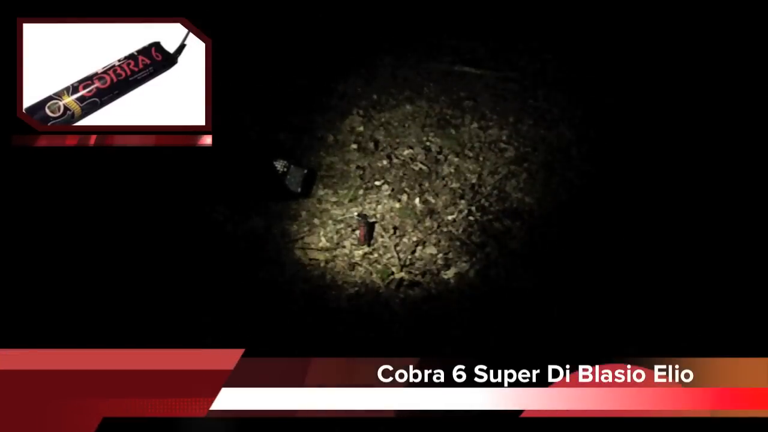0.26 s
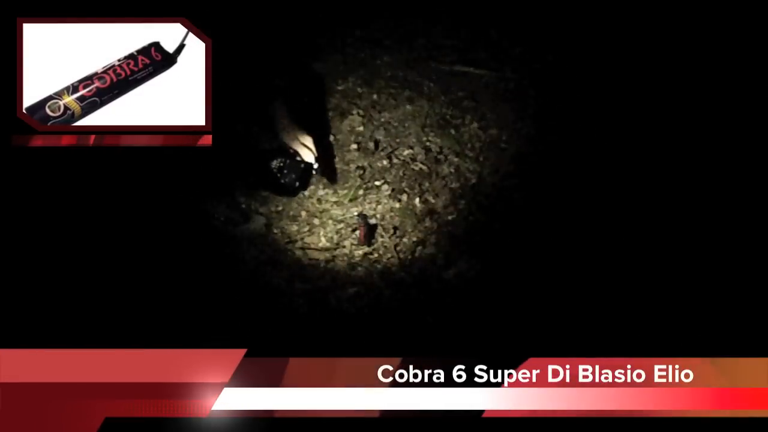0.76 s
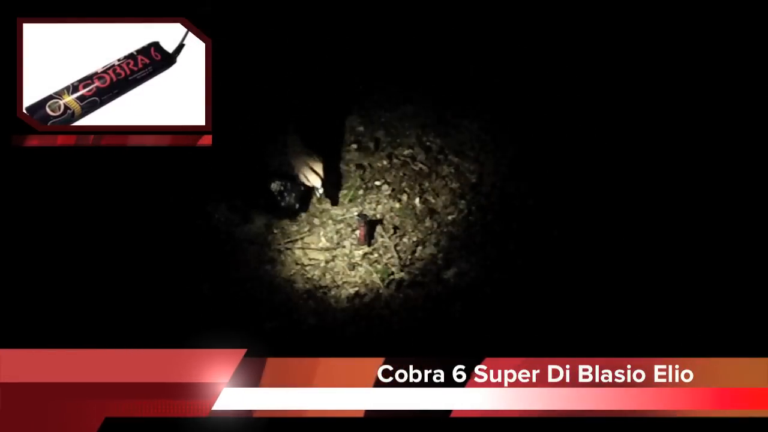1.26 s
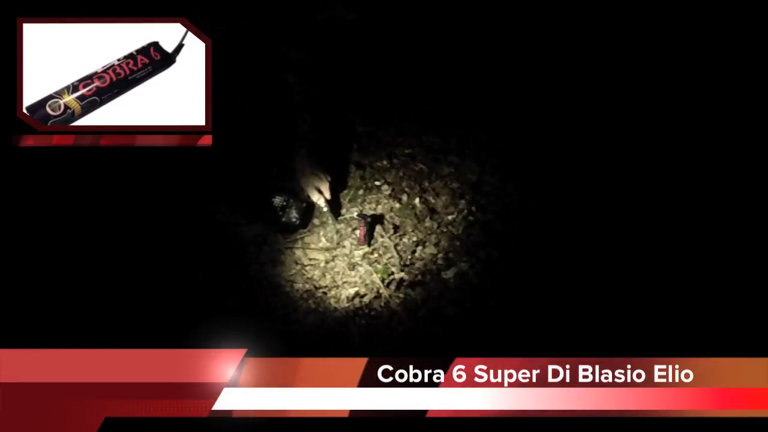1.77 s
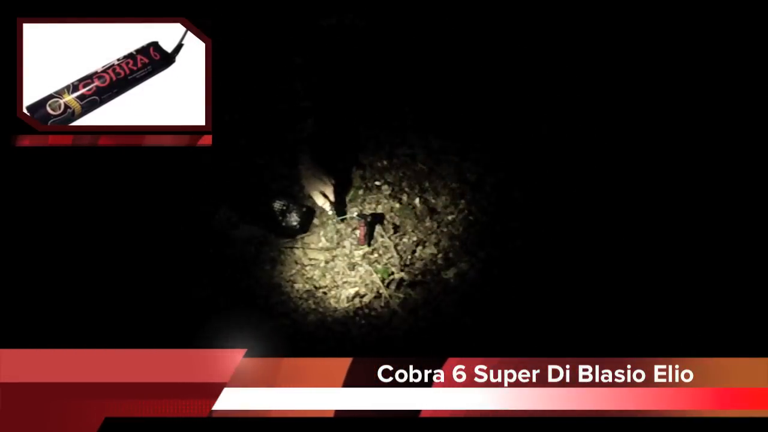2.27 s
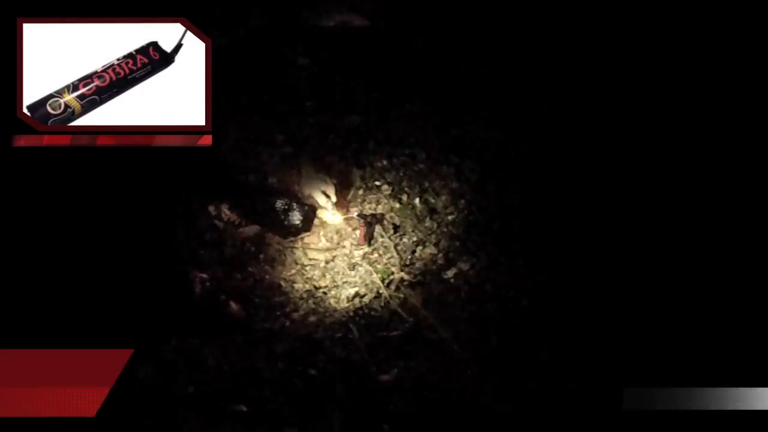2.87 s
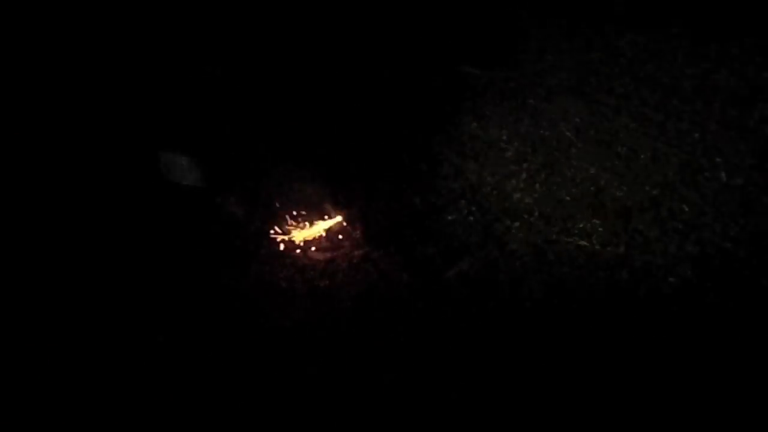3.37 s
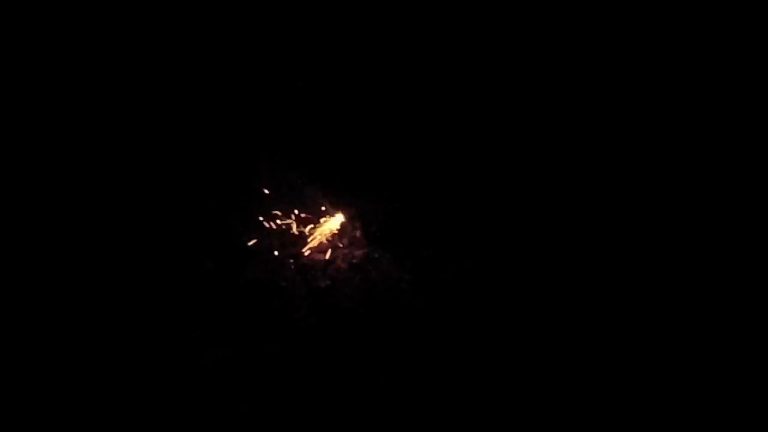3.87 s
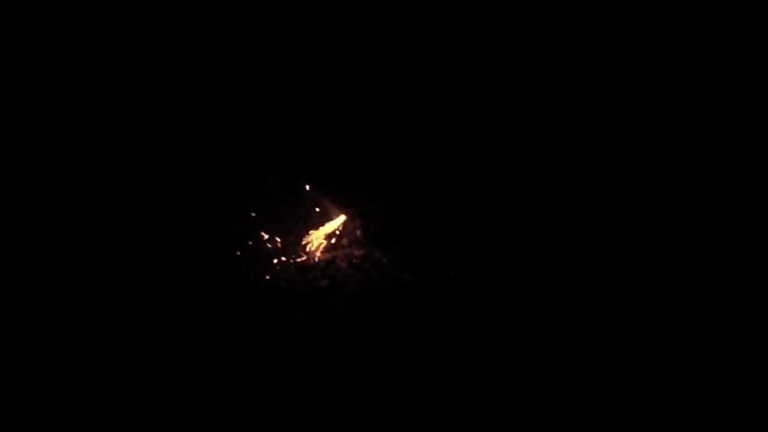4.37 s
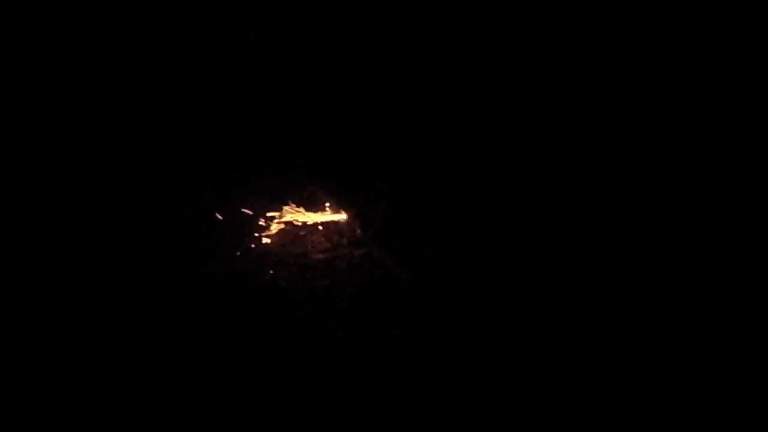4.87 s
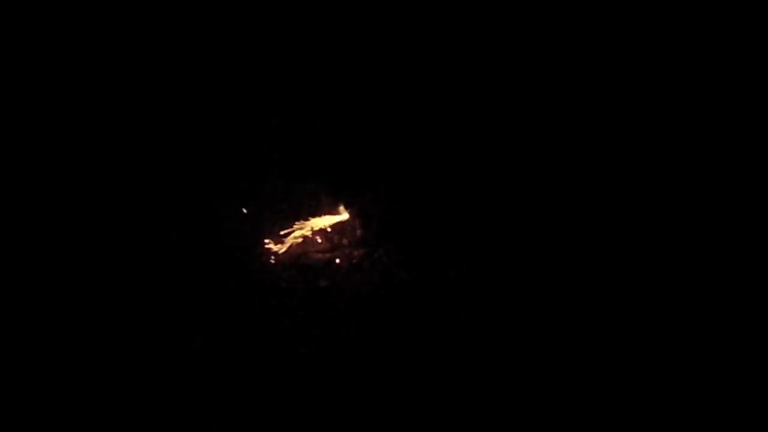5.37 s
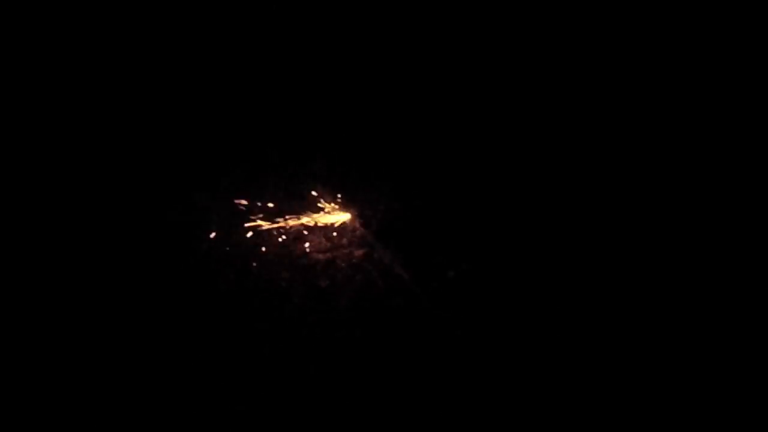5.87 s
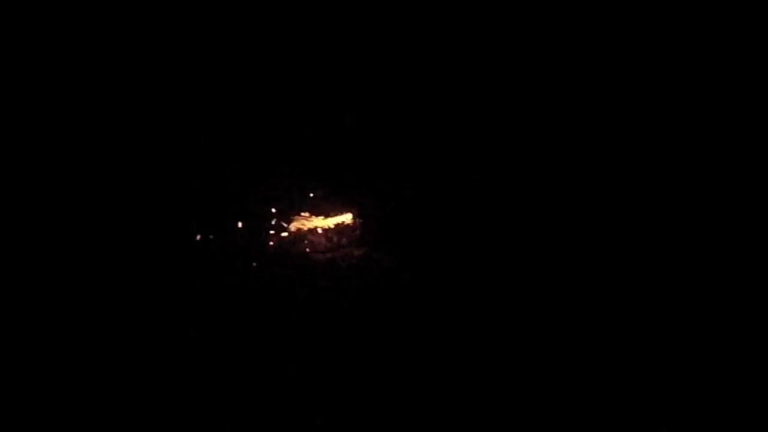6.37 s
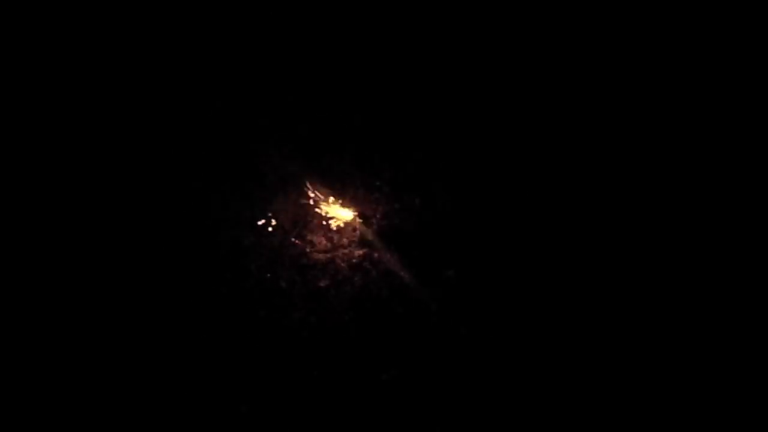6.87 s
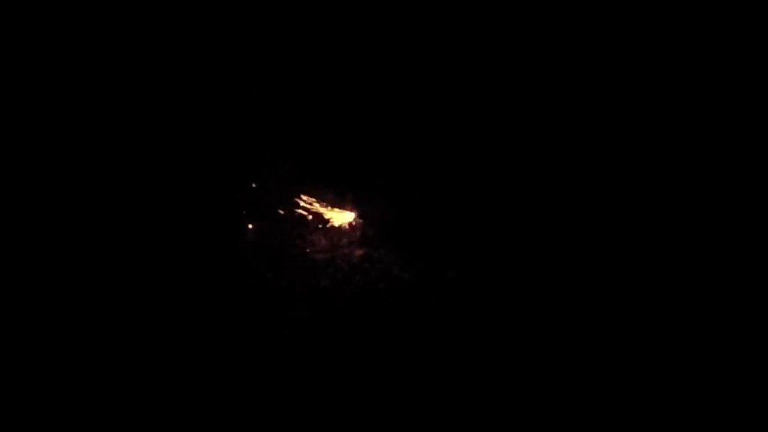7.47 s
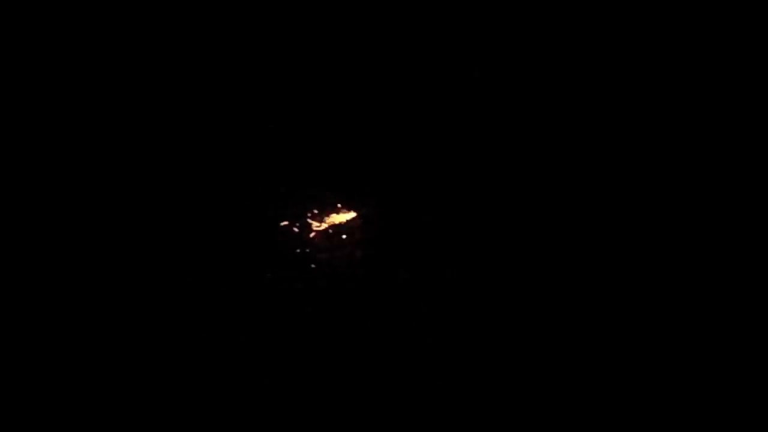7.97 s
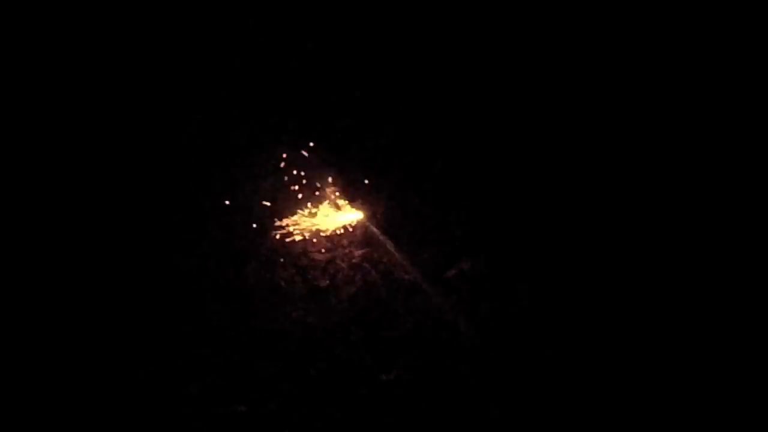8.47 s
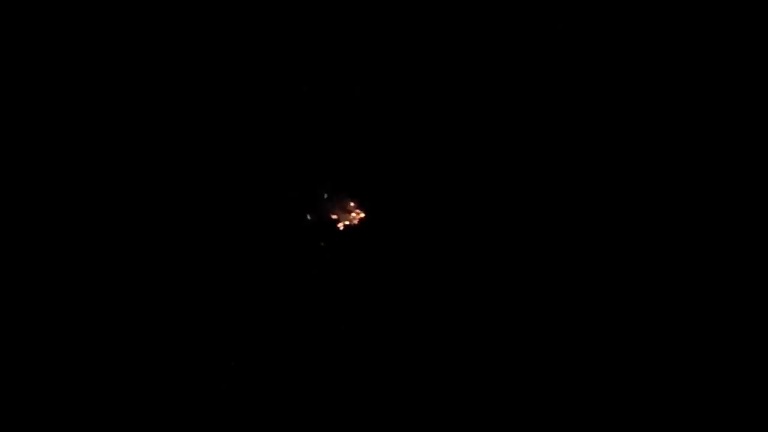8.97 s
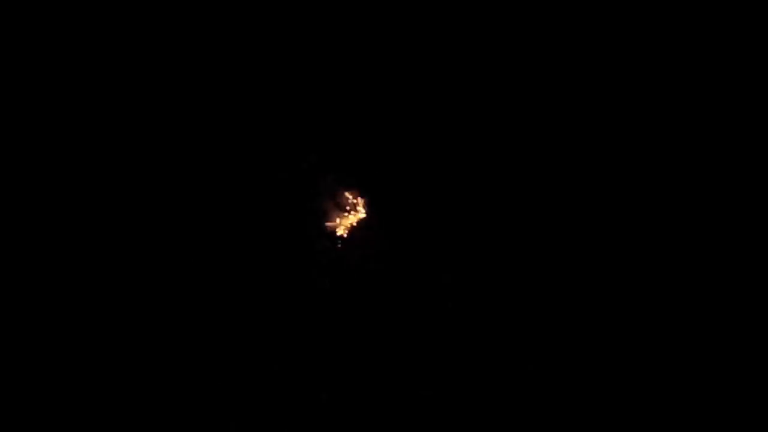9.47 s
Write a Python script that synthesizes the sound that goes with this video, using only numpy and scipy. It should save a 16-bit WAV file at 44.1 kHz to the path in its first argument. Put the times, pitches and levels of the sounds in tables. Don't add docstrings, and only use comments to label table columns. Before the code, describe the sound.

Quiet open ground with a low traffic rumble and soft tyre roar. Faint cloth brushing precedes a dry, loud lighter snap and a weak gas stream. The fuse then ignites, sputtering up into a steady airy hiss full of fine sparks and small crackles. Soles drag, heels thud and stones knock briefly. The hiss weakens, flares strongly, then stays bright and thin. Single microphone, centred, dry; there is no final explosion.

```python
import sys
import numpy as np
from scipy import signal
from scipy.fft import rfft, irfft, next_fast_len
from scipy.io import wavfile
from scipy.ndimage import uniform_filter1d

SR = 44100
rng = np.random.default_rng(int(sys.argv[2]) if len(sys.argv) > 2 else 0)


def transcribe(signal):
    frames = np.atleast_2d(signal).T
    limited = np.clip(frames, -1, 1)
    pcm = np.round(limited * 32767).astype(np.int16)
    wavfile.write(sys.argv[1], SR, pcm)


def gain_from_decibels(decibels):
    exponent = np.asarray(decibels, float) / 20
    return 10 ** exponent


N = 428211
TIME = np.arange(N) / SR


def curves(table):
    s, *columns = np.transpose(table)
    return [np.interp(TIME, s, column) for column in columns]


def colour(x, points):
    hz, db = np.transpose(points)
    size = next_fast_len(len(x))
    log_hz = np.log(np.arange(size // 2 + 1) * SR / size + 1)
    gain = gain_from_decibels(np.interp(log_hz, np.log(hz), db))
    return irfft(rfft(x, size) * gain, size)[:len(x)]


def band(x, lo_hz, hi_hz):
    return signal.sosfiltfilt(signal.butter(3, [lo_hz, hi_hz], "band", fs=SR, output="sos"), x)


def unit(x, lo_hz, hi_hz):
    return x / np.std(band(x, lo_hz, hi_hz))


def walk(rate):
    hold = int(SR / rate)
    steps = np.repeat(rng.standard_normal(N // hold + 1), hold)
    return 1.02 * uniform_filter1d(uniform_filter1d(steps, hold), hold)[:N]


def add(out, s, sound):
    i = int(round(s * SR))
    out[i:i + len(sound)] += sound[:N - i]


def ring(hz, t60, attack):
    t = np.arange(int(t60 * SR) + 8) / SR
    y = np.sin(2 * np.pi * hz * t) * (1 - np.exp(-t / attack)) * np.exp(-np.log(1000) * t / t60)
    return y / np.abs(y).max()


def hits(events, cycles, trim_db):
    out = np.zeros(N)
    for s, db, hz in events:
        add(out, s + 0.00118, gain_from_decibels(db + trim_db) * ring(hz, cycles / hz, .3 / hz))
    return out


def bursts(events, t60, trim_db):
    out, t = np.zeros(N), np.arange(512) / SR
    envelope = gain_from_decibels(-60 * t / t60) * np.clip(t / 0.00037, 0, 1)
    for (s, db, hz), noise in zip(events, rng.standard_normal((len(events), 512))):
        puff = band(noise, hz / 1.77, min(hz * 1.84, 16000)) * envelope
        add(out, s + .0008, gain_from_decibels(db + trim_db) * puff / np.abs(puff).max())
    return out


def swells(events):
    out = np.zeros(N)
    for s, db, width in events:
        near = slice(max(int((s - 4 * width) * SR), 0), int((s + 4 * width) * SR))
        out[near] += db * np.exp(-.5 * ((TIME[near] - s) / width) ** 2)
    return out


# (t/s, steady hiss level/dB, swing level/dB by which the low roar stands out)
BURN = [(2.58, -74, -2), (2.66, -70, -7), (2.78, -57, -5), (2.86, -45.5, 2), (3.05, -40, -3),
        (3.3, -40.5, -2), (4.0, -42, -2.5), (5.0, -42.5, -0.5), (5.6, -42, -0.5), (6.5, -46, -1.5),
        (7.0, -48, -0.5), (7.6, -44.5, -3.5), (7.95, -43.5, -6), (8.38, -42.5, 1), (8.75, -43.5, -8),
        (9.15, -42.5, -7.5), (9.55, -39, -7.5), (9.71, -39.5, -8.5)]
# (t/s, swell level/dB, half width/s)
POWDER_SURGES = [(2.6, 6, .012), (2.68, 5, .012), (3.316, 7, .024), (3.468, 1.7, .075), (3.555, 5.5, .013),
                 (3.705, 2.7, .027), (3.993, 3.5, .02), (4.225, 2, .03), (4.28, -3.5, .035), (4.39, 3, .06),
                 (4.666, 1.9, .035), (4.821, 3.7, .031), (5.071, 2.7, .038), (5.241, 4, .062),
                 (5.437, 5.5, .018), (5.536, 3.7, .081), (5.765, 4, .044), (5.826, -3.8, .025),
                 (5.954, 4.9, .059), (6.146, 3, .04), (6.317, 3.6, .036), (6.464, 4.3, .063),
                 (6.7, 6.2, .041), (7.219, 5.2, .071), (7.562, 4.1, .048), (8.32, 3, .045),
                 (8.39, 10, .155), (8.857, 4.3, .095), (9.433, 1.5, .025)]
# (f/Hz, density level/dB per Hz)
JET_TONE = [(410, -38), (700, -22), (1300, -11), (1900, -4.5), (2700, -5), (3800, -5), (5500, -2.5),
            (8500, -2), (11700, -3.5), (13500, -6.5), (15400, -12.5)]
# (t/s, peak level/dB, centre f/Hz)
POPS = [(2.5932, -48, 5030), (2.6182, -48, 6950), (2.674, -41, 7060), (2.694, -45, 4820),
        (2.7025, -43, 7730), (2.7638, -41, 8170), (2.8247, -32, 7040), (2.946, -23, 8140),
        (3.0467, -21, 8020), (3.2961, -19, 6820), (3.3097, -12, 6260), (3.5446, -24, 7210),
        (3.8539, -23, 6290), (4.2959, -26, 11600), (5.1805, -30, 7150), (5.8473, -25, 8550),
        (6.3133, -22, 8690), (6.4214, -29, 8770), (7.1758, -23, 7560), (8.217, -22, 9020),
        (9.3668, -27, 7800)]


def fuse():
    steady_db, swing_db = curves(BURN)
    surge_db = swells(POWDER_SURGES)
    hiss_db = steady_db + surge_db

    sparks_per_s, spark_fade_s = 150, 0.00051
    chance, size, gas = rng.random(N), rng.exponential(size=N), rng.standard_normal(N)
    sparks = (chance < sparks_per_s / SR) * gain_from_decibels(2.6 * np.minimum(size, 2.5))
    flare = signal.lfilter([1], [1, -np.exp(-1 / (spark_fade_s * SR))], sparks)
    flutter = gain_from_decibels(0.9 * walk(40) + 0.59 * walk(150))
    jet = unit(colour(gas * (flutter + 0.45 * flare), JET_TONE), 6950, 11000)

    body_swing, fizz_swing = .75, -.4
    lag_db = .4 * surge_db
    roar_db = swing_db - lag_db
    body_db = body_swing * np.minimum(swing_db + 2, 1.5) - 0.8 - body_swing * lag_db
    fizz_db = fizz_swing * np.minimum(swing_db + 2, 0) - 2.1
    roar = band(jet, 300, 3600) * (gain_from_decibels(roar_db) - 1)
    body = band(jet, 3600, 7000) * (gain_from_decibels(body_db) - 1)
    fizz = band(jet, 11200, 20000) * (gain_from_decibels(fizz_db) - 1)
    jet = (jet + roar + body + fizz) * gain_from_decibels(hiss_db) * (TIME > BURN[0][0])

    flame = unit(band(rng.standard_normal(N), 180, 520), 180, 520) * gain_from_decibels(1.5 * hiss_db - 13)
    return flame + reflect(jet + bursts(POPS, t60=0.0035, trim_db=-2.5))


# (start t/s, end t/s, lag/ms, strength -1..1)
ECHOES = [(2.5, 4.2, .208, -.05), (2.5, 6.0, .275, -.075), (2.5, 4.2, .317, -.1), (2.5, 5.5, .547, -.11),
          (2.5, 3.5, 1.362, -.07), (3.5, 4.9, .432, .075), (4.9, 6.05, .45, .14), (3.5, 6.05, .685, .13),
          (3.5, 6.05, .855, .12), (4.9, 6.05, .777, .1), (4.2, 5.5, 1.19, -.07), (4.9, 5.5, 1.31, -.09),
          (5.5, 6.6, 1.149, .065), (6.05, 8.1, .184, -.1), (6.05, 7.6, .311, -.12), (7.6, 8.65, .298, -.12),
          (6.05, 8.1, .519, -.11), (6.05, 8.1, .583, -.12), (6.05, 6.6, 1.064, .15), (6.6, 7.6, .793, .08),
          (6.6, 8.1, 1.26, -.065), (7.6, 8.1, .669, -.14), (8.1, 9.8, .222, .12), (8.1, 9.2, .615, -.12),
          (8.65, 9.8, .367, .085), (8.65, 9.2, .483, .1), (9.2, 9.8, .441, .1), (8.65, 9.8, .575, -.085),
          (8.65, 9.8, .806, -.075), (9.2, 9.8, .68, .06)]


def reflect(jet):
    gain, fade_s = 1.35, .4
    heard = jet.copy()
    for start, end, lag_ms, strength in ECHOES:
        i = int((start - fade_s / 2) * SR)
        j = min(int((end + fade_s / 2) * SR), N)
        fade = np.clip(np.minimum(TIME[i:j] - start, end - TIME[i:j]) / fade_s + .5, 0, 1)
        late = np.arange(96) - lag_ms * SR / 1000
        kernel = np.sinc(late) * np.exp(-.5 * (late / 4) ** 2)
        add(heard, i / SR, gain * strength * signal.oaconvolve(fade * jet[i:j], kernel))
    return heard


# (f/Hz, level/dB, t60/s)
LIGHTER_MODES = [(2690, -11.5, .025), (3960, -0.5, .018), (5460, 1, .009), (6700, -9, .009),
                 (7340, -1, .03), (7900, -5, .025), (8470, -5, .02), (9400, -10, .01), (10900, -14, .02),
                 (11500, -11, .02), (12050, -15, .012), (13600, -14, .02), (14160, -16, .015),
                 (15070, -19, .015)]
# (t/s, level/dB)
GAS = [(1.7, -80), (1.9, -71), (2.3, -70.5), (2.65, -73), (2.8, -81)]
# (t/s, peak level/dB, centre f/Hz)
TICKS = [
    (0.5294, -51, 7550),
    (0.6994, -53, 4060),
    (1.5045, -47, 2700),
    (1.5045, -46, 11500),
]


def lighter():
    snap_s, snap_db, free_s = 1.6935, -11.3, .0025
    t = np.arange(SR // 2) / SR
    body = np.zeros(len(t))
    for (hz, db, t60), late in zip(LIGHTER_MODES, rng.random(len(LIGHTER_MODES))):
        add(body, .00008 * late, gain_from_decibels(db) * ring(hz, t60, .0003))
    thumb = gain_from_decibels(-60 * np.maximum(t - free_s, 0) / .0015)
    body = body * np.maximum(thumb, gain_from_decibels(-5 - 60 * t / .03))
    body = signal.sosfilt(signal.butter(3, 1500, "high", fs=SR, output="sos"), body)

    scatter = rng.standard_normal(len(t)) * (gain_from_decibels(-49 - 60 * t / .05) + gain_from_decibels(-59 - 60 * t / 0.55))
    scatter = colour(scatter, [(6000, 0), (15000, -6)])
    answer = signal.fftconvolve(scatter, body * gain_from_decibels(12 - 60 * t / .004))[:len(t)]
    out = np.zeros(N)
    add(out, snap_s, gain_from_decibels(snap_db) * (body + answer))
    add(out, snap_s, gain_from_decibels(-32) * ring(140, .03, .002))

    nozzle = [(4000, -26), (4900, -3), (5350, 2), (5800, -13), (6800, -30)]
    gas = unit(colour(rng.standard_normal(N), nozzle), 4800, 5800)
    gas = gas * gain_from_decibels(curves(GAS)[0]) * (TIME > snap_s) * (TIME < GAS[-1][0])
    return out + gas + bursts(TICKS, t60=.006, trim_db=-1.5)


# (t/s, peak level/dB, rise/s, fall/s per 10 dB)
RUSTLES = [
    (.09, -67, .02, .1),
    (.36, -60.5, .15, .3),
    (.62, -70, .05, .1),
    (1.05, -65.5, .15, .3),
    (1.18, -59.5, .04, .4),
    (1.6, -64, .04, .15),
    (2.03, -67, .08, .05),
    (2.15, -70, .06, .1),
]
# (f/Hz, density level/dB per Hz)
CLOTH_TONE = [(1180, -40), (2000, -18), (2480, -14), (2670, -10), (3250, -9), (4820, -2.5), (9630, -1),
              (13400, -11), (15400, -14)]
# (t/s, peak level/dB, f/Hz)
GRAVEL = [(3.545, -37, 872), (3.674, -40, 697), (3.695, -37, 501), (3.861, -39, 654), (3.874, -40, 622),
          (3.983, -30, 851), (4.016, -38, 550), (4.194, -37, 560), (4.275, -41, 888), (4.478, -29, 500),
          (4.497, -32, 945), (4.507, -38, 501), (4.531, -36, 501), (4.536, -28, 1410), (4.639, -39, 685),
          (4.764, -40, 565), (4.773, -31, 524), (4.784, -33, 867), (4.889, -44, 570)]
# (t/s, level/dB)
SHUFFLE = [(2.8, -77), (3.3, -62), (3.9, -62), (4.3, -60), (4.5, -57.5), (4.8, -59), (5.1, -70), (5.6, -72)]
# (t/s, peak level/dB, f/Hz)
HEELS = [
    (3.874, -27, 56.5),
    (4.298, -31, 56.5),
    (4.674, -26.5, 122),
    (4.789, -33, 56.5),
]


def person():
    cloth = unit(colour(rng.standard_normal(N) * gain_from_decibels(1.5 * walk(60)), CLOTH_TONE), 6000, 12000)
    power = np.zeros(N)
    for s, db, rise, fall in RUSTLES:
        away = np.maximum((s - TIME) / rise, (TIME - s) / fall)
        power += gain_from_decibels(db - 10 * away) ** 2
    rustle = cloth * np.sqrt(power)

    stones = hits(GRAVEL, cycles=3.6, trim_db=0.5)
    grit = hits([(s, db, 1.9 * hz) for s, db, hz in GRAVEL], cycles=2.4, trim_db=-1)
    soles = unit(band(rng.standard_normal(N), 130, 570), 130, 700)
    soles = soles * gain_from_decibels(curves(SHUFFLE)[0] + 3.3 * walk(30))
    soles = soles * (TIME > SHUFFLE[0][0]) * (TIME < SHUFFLE[-1][0])
    heels = hits(HEELS, cycles=1.9, trim_db=1.0)
    return rustle + stones + grit + soles + heels


# (t/s, rumble level/dB)
TRAFFIC = [(0, -38), (3.2, -39), (4.4, -35.5), (5.2, -38.5), (8.5, -40), (9.7, -38)]
# (f/Hz, density level/dB per Hz)
RUMBLE_TONE = [(12, -12), (22, -4), (35, -1), (60, -5), (82, -10), (120, -18), (170, -30), (400, -60)]
# (t/s, level/dB)
TYRE_ROAR = [(0, -60), (1.5, -59), (2.8, -58.5), (4.5, -57.5), (6, -58), (7.5, -58), (8.6, -59),
             (9.7, -58.5)]
# (f/Hz, density level/dB per Hz)
TYRE_TONE = [(88, -9), (150, -5.5), (258, -7.5), (509, -13), (900, -11), (1100, -9.5), (1400, -13.5),
             (1900, -24.5), (2640, -26.5), (3670, -32), (5300, -28.5), (7090, -30.5), (10300, -28),
             (15400, -48)]
# (t/s, level/dB)
DRONE = [(8.25, -89), (8.45, -63.5), (8.9, -63.5), (9.3, -67), (9.55, -76)]
# (t/s, f/Hz, level/dB)
WHINE = [(.5, 903, -85), (1.1, 905, -68), (1.6, 909, -68), (2.3, 914, -85)]


def traffic():
    rumble = unit(colour(rng.standard_normal(N), RUMBLE_TONE), 17, 110)
    rumble = rumble * gain_from_decibels(curves(TRAFFIC)[0] + 1.2 * walk(8))
    tyres = unit(colour(rng.standard_normal(N), TYRE_TONE), 250, 872)
    tyres = tyres * gain_from_decibels(curves(TYRE_ROAR)[0] + 0.55 * walk(6))

    drone = np.zeros(N)
    for hz, db in [(366, 0), (441, -5)]:
        drone += gain_from_decibels(db) * np.sin(2 * np.pi * hz * TIME + .6 * walk(5))
    drone = drone * gain_from_decibels(curves(DRONE)[0] + 3)

    hz, whine_db = curves(WHINE)
    turn = 2 * np.pi * np.cumsum(hz) / SR
    whine = gain_from_decibels(whine_db) * (np.sin(turn) + gain_from_decibels(-20) * np.sin(3 * turn))
    return rumble + tyres + drone + whine


def scene():
    mono = fuse() + lighter() + person() + traffic()
    return np.array([mono, mono])


def roll_off(x):
    return signal.sosfilt(signal.butter(12, 16440, fs=SR, output="sos"), x)


# (t/s, low f/Hz, high f/Hz)
SIDE_NOISE = [(.21, 5700, 9700), (2.06, 10300, 12400), (4.27, 8900, 10400), (5.29, 4600, 5700),
              (6.98, 12400, 13800), (7.22, 6200, 9700), (7.22, 11000, 15200), (8.56, 5700, 6900),
              (8.63, 14500, 15800), (9.43, 7500, 9000), (9.61, 6900, 8300), (9.61, 10300, 14500)]


def record(dry):
    top_hz, offset = 15720, .0345
    side = np.zeros(N)
    for s, lo_hz, hi_hz in SIDE_NOISE:
        i = int(s * SR) - 1024
        level = gain_from_decibels(-5) * np.std(band(dry[0, i:i + 2048], lo_hz, hi_hz))
        noise = unit(band(rng.standard_normal(2048), lo_hz, hi_hz), lo_hz, hi_hz)
        add(side, i / SR, level * noise * signal.windows.tukey(2048, .6))
    size = next_fast_len(N)
    spectrum = rfft(dry + np.array([side, -side]), size)
    spectrum[:, int(top_hz * size / SR):] = 0
    mix = irfft(spectrum, size)[:, :N] + offset
    return roll_off(mix)


dry = scene()
out = record(dry)
transcribe(out)
```